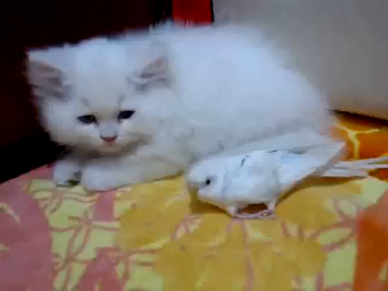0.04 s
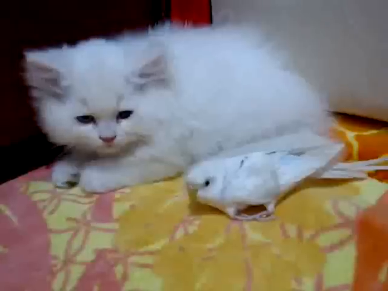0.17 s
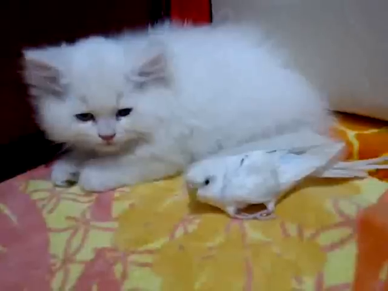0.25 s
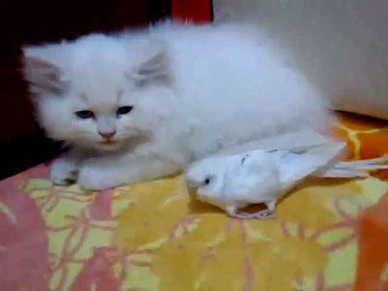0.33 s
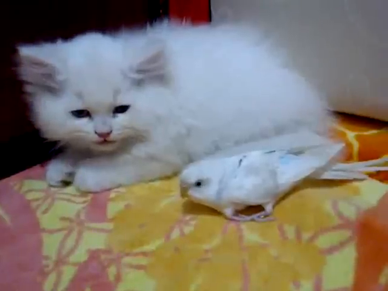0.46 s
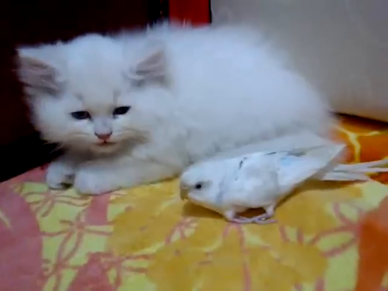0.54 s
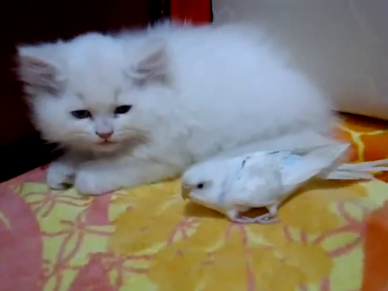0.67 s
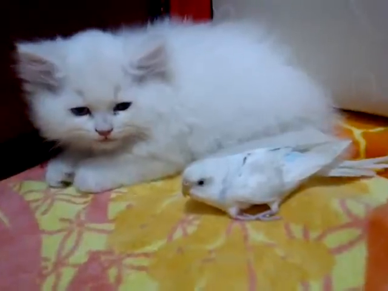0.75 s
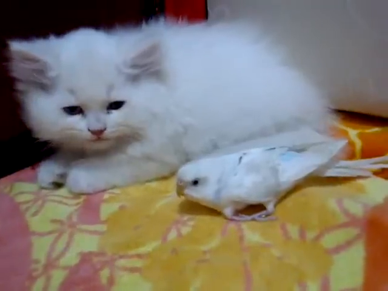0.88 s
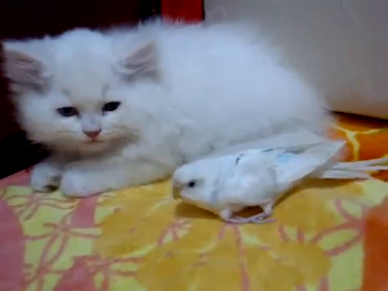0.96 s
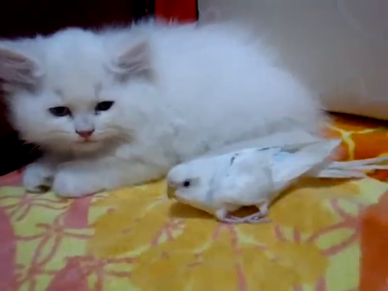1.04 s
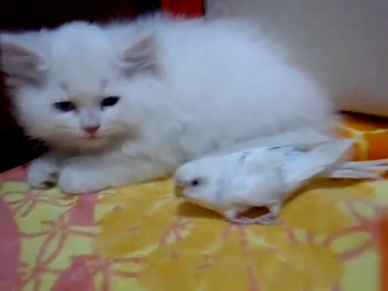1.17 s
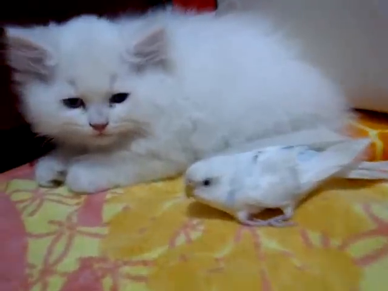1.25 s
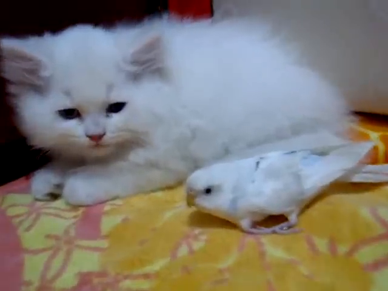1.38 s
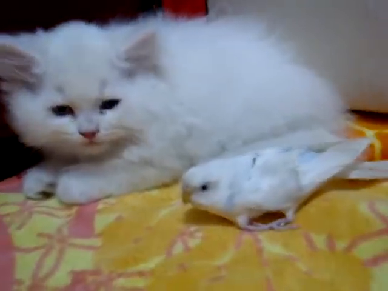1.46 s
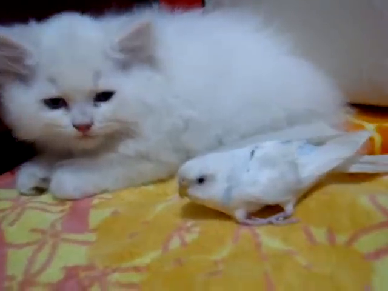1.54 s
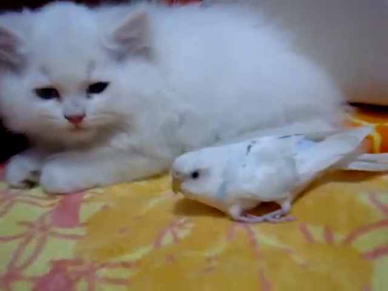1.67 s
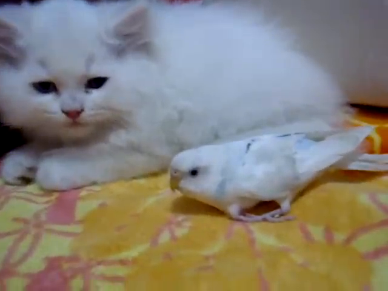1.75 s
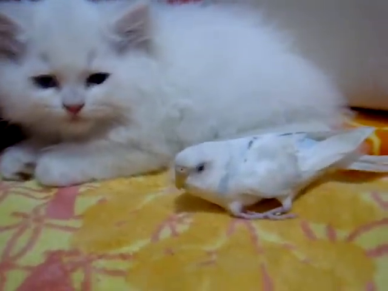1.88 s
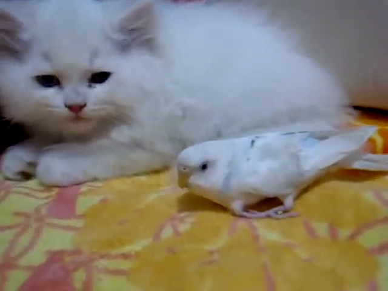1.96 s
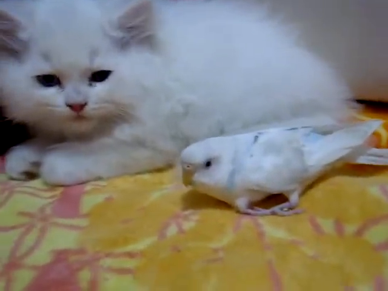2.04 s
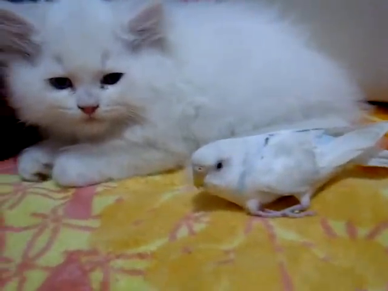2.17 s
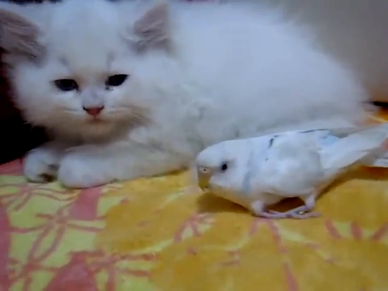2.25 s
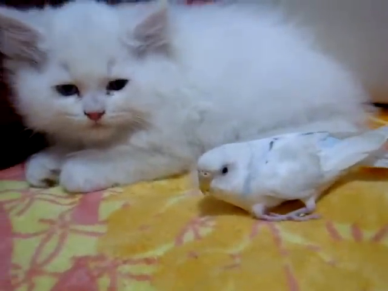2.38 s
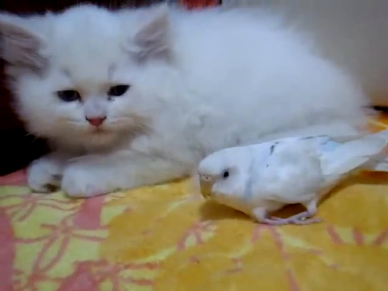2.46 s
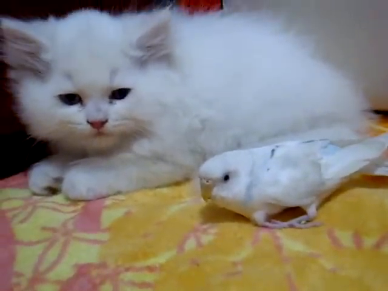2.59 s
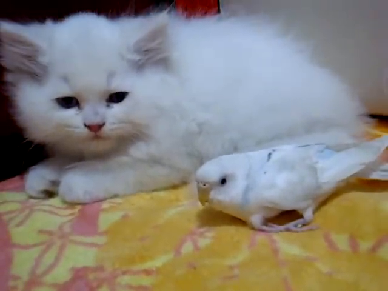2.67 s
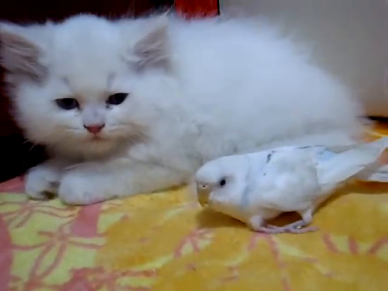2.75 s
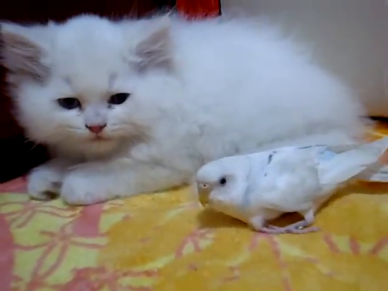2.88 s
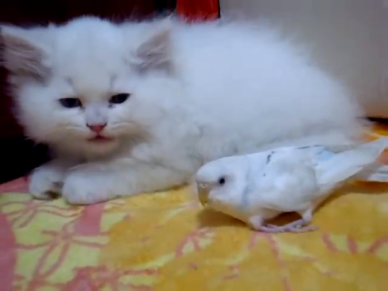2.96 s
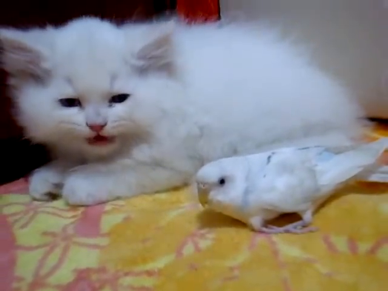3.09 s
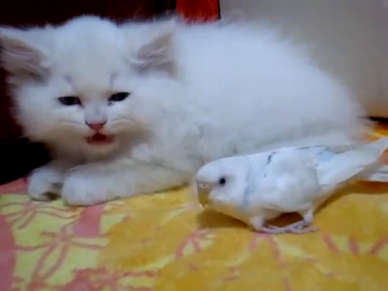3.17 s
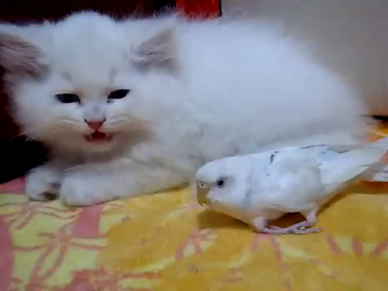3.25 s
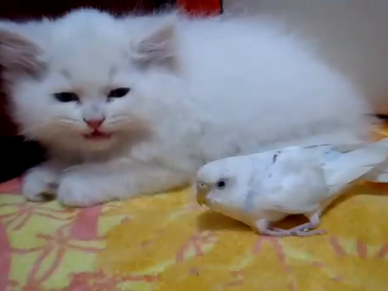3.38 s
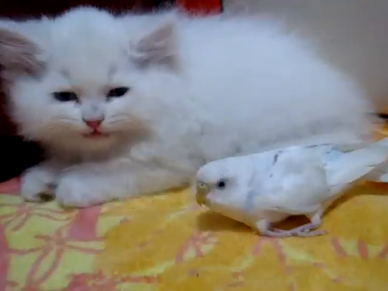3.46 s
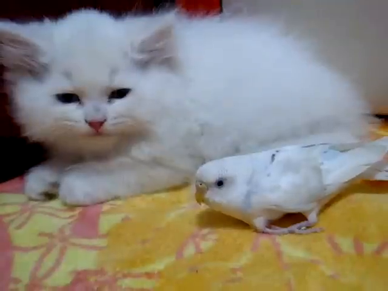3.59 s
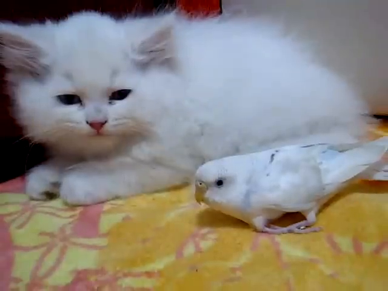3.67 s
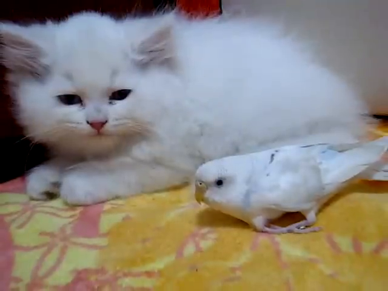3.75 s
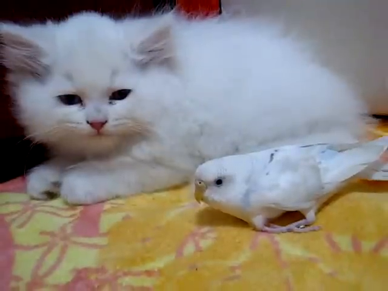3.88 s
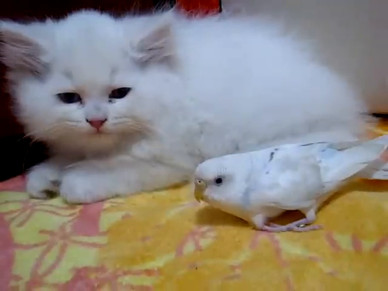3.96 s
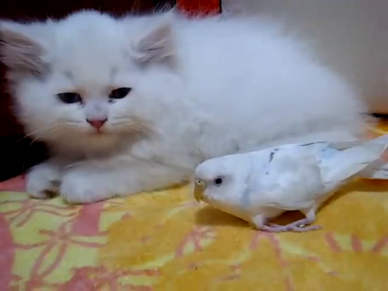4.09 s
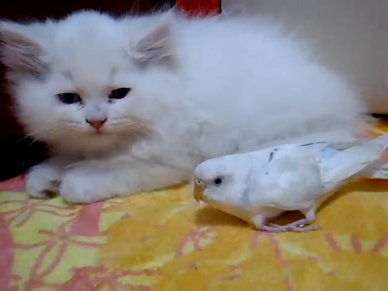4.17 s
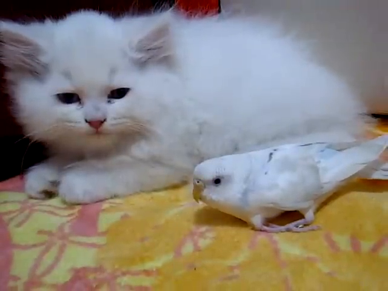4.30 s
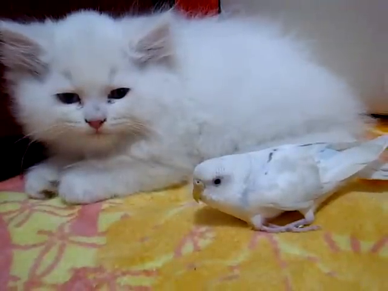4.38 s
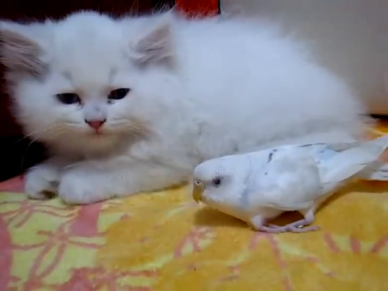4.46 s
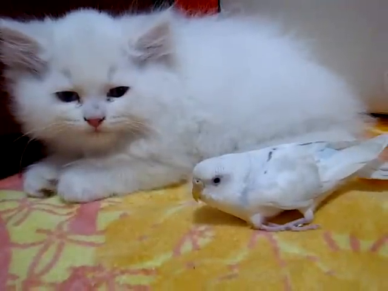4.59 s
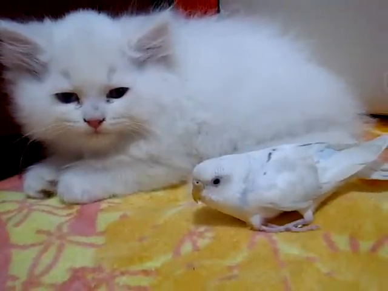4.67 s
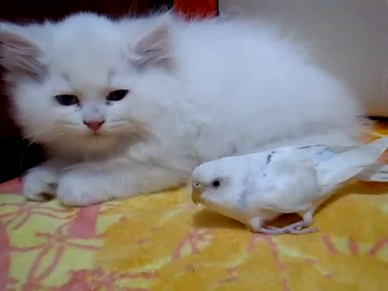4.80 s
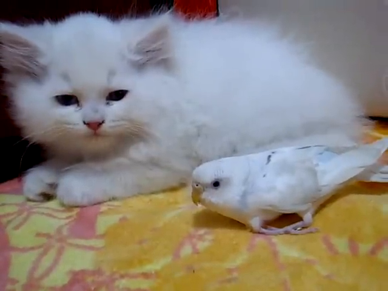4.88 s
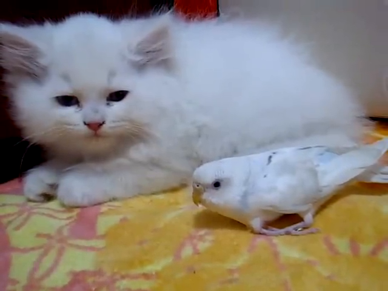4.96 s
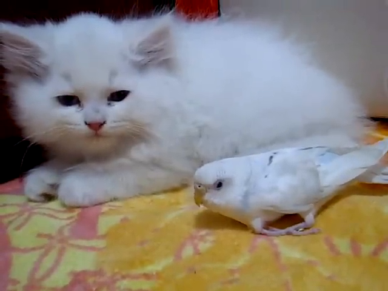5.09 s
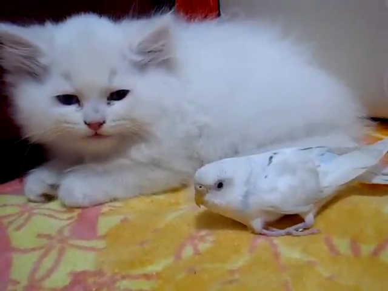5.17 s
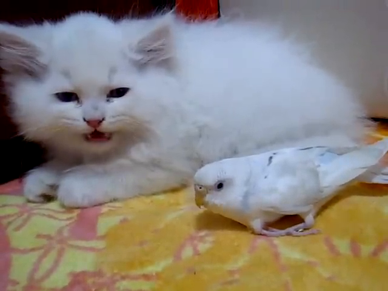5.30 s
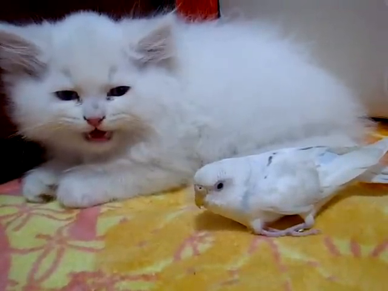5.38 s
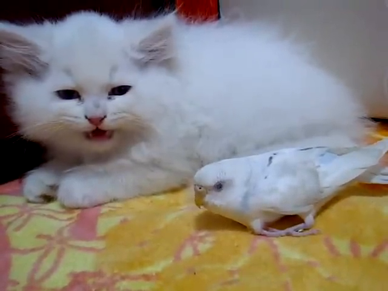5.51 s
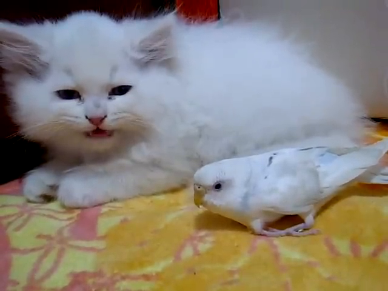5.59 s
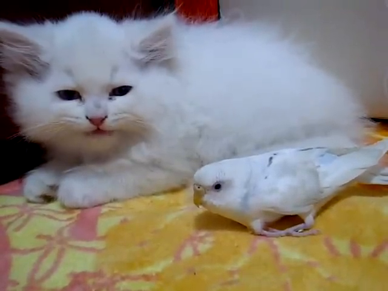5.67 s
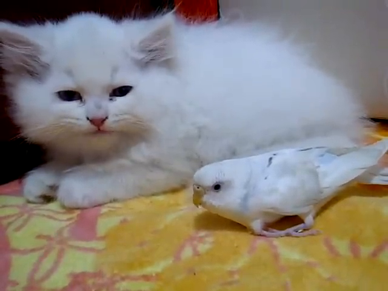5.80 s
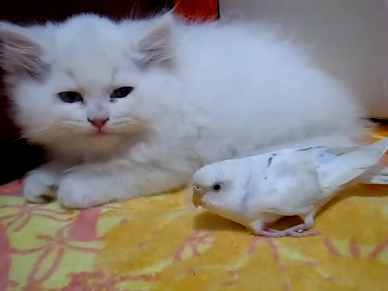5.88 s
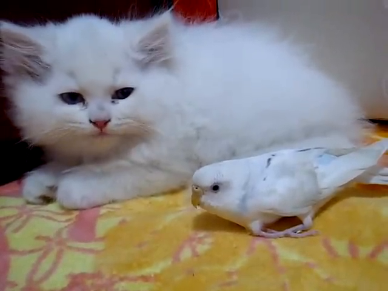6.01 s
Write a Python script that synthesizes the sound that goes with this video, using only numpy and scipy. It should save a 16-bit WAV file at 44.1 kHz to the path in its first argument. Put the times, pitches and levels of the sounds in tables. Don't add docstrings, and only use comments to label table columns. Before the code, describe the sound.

A kitten gives three thin, wavering mews in a small bedroom, with plastic handling clicks and thumps between them over low hum and hiss.

```python
import sys
import numpy as np
from scipy import signal
from scipy.io import wavfile
from scipy.ndimage import uniform_filter1d

SR = 44100
rng = np.random.default_rng(int(sys.argv[2]) if len(sys.argv) > 2 else 0)


def field_ratio(decibels):
    return 10 ** (np.asarray(decibels, dtype=float) / 20)


def dump_mix(stems):
    frames = np.atleast_2d(stems).T
    limited = np.clip(frames, -1, 1)
    pcm = np.round(limited * 32767).astype(np.int16)
    wavfile.write(sys.argv[1], SR, pcm)


N = 266319


def evened(x):
    return x / np.sqrt(np.mean(x ** 2) + 1e-20)


def read(points, hz):
    f, value = np.transpose(points)
    return np.interp(np.log(hz + 1), np.log(f + 1), value)


def add(mix, s, sound):
    part = mix[round(s * SR):][:len(sound)]
    part += sound[:len(part)]


def resonate(x, hz, width_hz):
    turn = np.exp(2j * np.pi * hz * np.arange(len(x)) / SR)
    r = np.exp(-np.pi * width_hz / SR)
    return 2 * (turn * signal.lfilter([1 - r], [1, -r], x / turn)).real


def resonate_twice(x, hz, width_hz):
    return resonate(resonate(x, hz, width_hz), hz, width_hz)


def drift(count, size):
    rough = uniform_filter1d(uniform_filter1d(rng.standard_normal(count), size), size)
    return evened(rough - uniform_filter1d(rough, 6 * size))


def rumble_and_hiss():
    # f/Hz, density/dB
    floor = [(30, -31), (48, -3), (70, -17.5), (120, -6.5), (290, -6.5), (460, -9.5), (830, -12),
             (2080, -21), (3000, -25), (4300, -23), (6750, -23), (9500, -26.5)]
    level_db = -57.5 - 0.5
    frames, hz = N // 256 + 5, np.fft.rfftfreq(1024, 1 / SR)
    a, b, patches = rng.standard_normal((frames, 513, 3)).T
    patches = uniform_filter1d(patches, size=10, axis=0)
    patches = evened(uniform_filter1d(patches, size=12, axis=1))
    patchy_db = 1.5 * patches / (1 + hz[:, None] / 1500)
    z = (a + 1j * b) * field_ratio(read(floor, hz)[:, None] + patchy_db)
    noise = signal.istft(z, nperseg=1024, noverlap=768)[1][:N]
    return field_ratio(level_db) * evened(noise)


def hum():
    # f/Hz, width/Hz, level/dB
    hums = [(101.9, 5.7, -68), (153.6, 16, -68), (791, 9.9, -76.5), (1285, 10, -86.5)]
    return sum(field_ratio(db) * evened(resonate_twice(rng.standard_normal(N), f, w)) for f, w, db in hums)


def clock_buzz():
    # f/Hz, level/dB
    envelope = [(3400, -100), (4000, -85.5), (5300, -84.5), (6900, -89.5), (8300, -91)]
    t, buzz = np.arange(N) / SR, np.zeros(N)
    for hz in 268.15 * np.arange(12, 33):
        level_db = read(envelope, hz) + 0.5 * rng.standard_normal()
        buzz += np.sqrt(2) * field_ratio(level_db) * np.sin(2 * np.pi * hz * t)
    return buzz


def bias_settling():
    return -field_ratio(-46) * np.exp(-np.arange(9000) / SR / .04)


def rattle(length_s, db, hz, width_hz):
    grain_spread_db = 2
    grains = rng.standard_normal(9000) * field_ratio(grain_spread_db * rng.exponential(1, 9000))
    ring = resonate_twice(grains[:round(length_s * SR)], hz, width_hz)
    return field_ratio(db) * evened(ring) * signal.windows.tukey(len(ring), .3)


def tick(db, hz, broad):
    t60_s = 0.0034 + 0.011 * broad
    t = np.arange(1300) / SR
    snap = rng.standard_normal(len(t)) * field_ratio(-60 * t / t60_s)
    snap[0] = -6
    sound = resonate_twice(snap, hz, 1100) + broad * resonate_twice(snap, 4100, 3700)
    return field_ratio(db) * sound / abs(sound).max()


def knock(db, direction, push_ms, hz):
    damping, w = 0.26, 2 * np.pi * hz
    t = np.arange(2500) / SR
    push = np.sin(np.pi * np.minimum(t * 1000 / push_ms, 1)) ** 2
    spring = signal.bilinear([1, 0, 0], [1, 2 * damping * w, w * w], SR)
    sound = signal.lfilter(*spring, push)
    return np.sign(direction) * field_ratio(db) * sound / abs(sound).max()


def jolt(rise_ms, db, hz, fold_ms):
    decay_turns = .32
    ms = np.arange(900) * 1000 / SR
    rise = np.interp(ms, [0, rise_ms, rise_ms + fold_ms + .01], [0, .8, 1])
    after_ms = ms - rise_ms - fold_ms
    turns = after_ms * hz / 1000
    swing = np.exp(-np.maximum(turns, 0) / decay_turns) * np.cos(2 * np.pi * turns)
    folding = np.clip(-after_ms / (fold_ms + 1e-6), 0, 1) % 1
    depth = 3.7 - 0.83 * fold_ms
    return field_ratio(db) * (np.where(after_ms < 0, rise, swing) - depth * np.sin(np.pi * folding) ** 1.35)


def handling():
    # t/s, peak/dB, ring/Hz, broad crackle/share; mostly panels under the fingers, the one at 0.158 s
    ticks = [(1.1363, -51.0, 5000, .5), (1.2075, -44.5, 4340, .6), (1.3783, -30.5, 5850, .92),
             (1.4037, -37.0, 4970, .9), (1.4406, -35.5, 5000, .91), (1.4619, -32.5, 4530, .95),
             (1.5281, -42, 4700, .7), (1.568, -34.5, 4900, .9), (1.811, -45.5, 4330, .3),
             (1.8261, -27.5, 5150, .7), (1.8617, -35.0, 4550, .9), (1.8866, -35.5, 4500, .8),
             (1.9663, -20, 4860, .55), (2.0791, -26, 3900, .01), (2.0793, -38, 6300, .01),
             (2.1582, -46.5, 2600, .1), (2.4073, -43.5, 4200, .3), (2.4147, -41, 4370, .4),
             (3.0454, -40.5, 6000, .3), (.1582, -30, 7700, .8), (2.8822, -24.5, 2450, .1)]
    # t/s, peak/dB, direction/sign, push/ms, rebound/Hz
    knocks = [
        (1.405, -38, 1, 1.54, 220),
        (1.8559, -36.5, 1, 3.4, 130),
        (1.962, -42, 1, 1.3, 200),
        (1.9657, -19, -1, 0.99, 208.5),
        (1.9758, -35.5, -1, 2.6, 119),
        (1.992, -47.5, 1, 6.6, 30),
        (2.086, -41.5, 1, 1.95, 190),
    ]
    # t/s, rise/ms, peak/dB, swing/Hz, fold-over/ms
    jolts = [
        (.158, .02, -14, 400, 0),
        (.159, 2, -7.9, 310, 1.46),
        (2.8812, .09, -15.6, 200, .46),
    ]
    # t/s, length/s, level/dB, ring/Hz, width/Hz
    rattles = [(0.442, 0.016, -61.5, 940, 150), (1.102, 0.16, -70.5, 2190, 2000),
               (1.527, 0.0038, -56, 2410, 900), (1.894, 0.021, -62, 4800, 2500),
               (1.95, 0.041, -54.5, 4300, 1500), (1.966, 0.0255, -46.5, 4950, 1530),
               (1.9724, 0.024, -51, 1890, 1500), (2.005, .18, -63.5, 1660, 2000),
               (2.0788, .0017, -42, 1750, 600), (2.396, 0.039, -62.5, 4500, 2000),
               (2.8806, 0.021, -43.5, 1090, 2300), (2.882, 0.018, -54, 5000, 3540),
               (3.045, 0.0067, -55.5, 4270, 900), (3.046, .005, -60, 6100, 1210)]
    case = np.zeros(N)
    for s, *row in ticks:
        add(case, s - .0002, tick(*row))
    for s, *row in knocks:
        add(case, s, knock(*row))
    for s, *row in jolts:
        add(case, s, jolt(*row))
    for s, *row in rattles:
        add(case, s, rattle(*row))
    add(case, .1635, bias_settling())
    return case


def room(x):
    t60_s = 0.13
    t = np.arange(SR // 4) / SR
    tail = rng.standard_normal(len(t)) * field_ratio(-60 * t / t60_s) * (t > .003)
    return signal.fftconvolve(x, tail / np.linalg.norm(tail))[:N]


def mew(pitch, wobble, effort_db, sag_db, second_db, release_ms, shift_hz):
    # t/s, pitch slip/share
    catches = [
        (.495, -.05),
        (.543, -.05),
        (.581, -.09),
        (.665, .05),
        (.737, -.08),
        (.798, -.04),
        (3.218, .035),
        (3.587, .045),
        (5.83, -.03),
        (5.87, .04),
    ]
    # f/Hz, level re 2nd/dB
    third = [(2800, -13), (3100, -27)]
    # f/Hz, gain/dB
    bedding = [(800, -1), (860, 2), (920, 4), (975, -3), (1025, .9), (1075, -.3), (1135, -3.5), (1200, -1)]
    squeak_hz, squeak_ms, catch_ms = 165, 17, 3.4
    attack_db, attack_ms, release_db, closing_db = -20, 6, -9.5, -8

    s, hz = np.transpose(pitch)
    t = np.arange(s[0], s[-1], 1 / SR)
    ms, left_ms = (t - s[0]) * 1000, (s[-1] - t) * 1000
    done = (t - s[0]) / (s[-1] - s[0])
    squeak = np.maximum(1 - ms / squeak_ms, 0)
    hz = np.interp(t, s, hz) + squeak_hz * squeak
    slips = sum(slip * np.exp(-((t - at) * 1000 / catch_ms) ** 2) for at, slip in catches)
    phase = 2 * np.pi * np.cumsum(hz * (1 + slips + wobble * drift(len(t), size=130))) / SR

    overtones = field_ratio(second_db + closing_db * (done ** 4 + squeak)) * np.sin(2 * phase)
    overtones += field_ratio(second_db + read(third, 3 * hz)) * np.sin(3 * phase)
    tone = field_ratio(read(bedding, hz - shift_hz)) * np.sin(phase) + overtones

    level_db = effort_db + sag_db * done
    level_db += attack_db * np.maximum(1 - ms / attack_ms, 0)
    level_db += release_db * np.maximum(1 - left_ms / release_ms, 0)
    level_db += 50 * wobble * drift(len(t), size=200) - 22 * abs(slips)
    return s[0], np.sqrt(2) * field_ratio(level_db) * tone * signal.windows.tukey(len(t), .02)


def kitten():
    # effort/dB, sag over mew/dB, 2nd harmonic/dB, release/ms, reflection shift by head posture/Hz
    mews = [
        (-47.5, -0.5, -27, 25, 23),
        (-43.2, -3, -22, 18, 2),
        (-41, -2, -21, 35, -4),
    ]
    wobbles = [.014, .008, .004]
    # t/s, f/Hz
    pitches = [
        [(.474, 1030), (.6, 1042), (.67, 1035), (.79, 1008), (.85, 989), (.89, 946), (.94, 919), (.968, 837),
         (.99, 807)],
        [(3.1, 1016), (3.125, 1036), (3.175, 1122), (3.2, 1089), (3.39, 1067), (3.575, 918), (3.607, 979),
         (3.665, 902), (3.678, 850)],
        [(5.368, 950), (5.4, 1020), (5.455, 1073), (5.61, 1057), (5.74, 973), (5.815, 866), (5.851, 790),
         (5.88, 885), (5.888, 930)],
    ]
    voice = np.zeros(N)
    for pitch, wobble, row in zip(pitches, wobbles, mews):
        add(voice, *mew(pitch, wobble, *row))
    return voice


def scene():
    steady = rumble_and_hiss() + hum() + clock_buzz()
    hands = handling()
    voice = kitten()
    return (voice + field_ratio(-28) * room(voice) + hands + steady)[None]


def roll_off(x):
    return signal.sosfilt(signal.butter(12, 8990, fs=SR, output="sos"), x)


def record(dry):
    # f/Hz, gain/dB
    edge = [(20, -1.5), (6900, 0.5), (7600, -4), (8300, -14), (8800, -23.5), (9100, -45.5)]
    on_s, fade_s = 0.1512, 0.02
    opening = np.clip((np.arange(N) / SR - on_s) / fade_s + .5, 0, 1) ** 2
    hz = np.linspace(0, SR / 2, 257)
    taps = signal.firwin2(511, hz, field_ratio(read(edge, hz)), fs=SR)
    mix = signal.oaconvolve(dry * opening, taps[None], "same")
    return roll_off(mix)


dry = scene()
out = record(dry)
dump_mix(out)
```